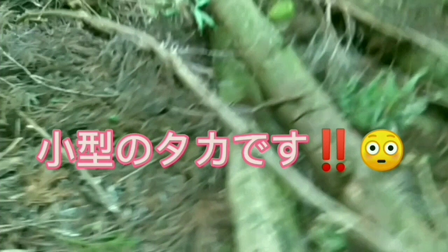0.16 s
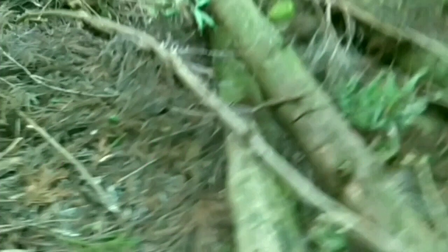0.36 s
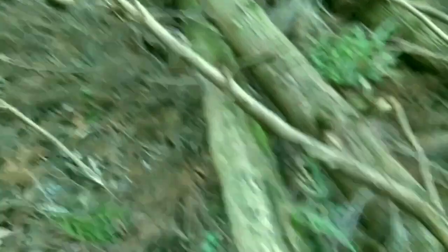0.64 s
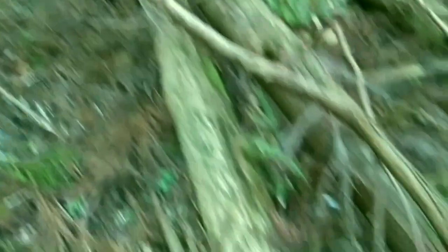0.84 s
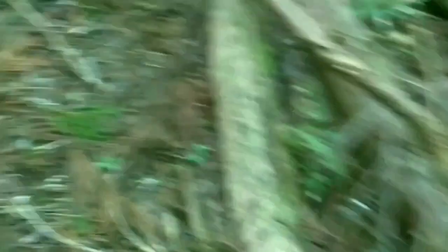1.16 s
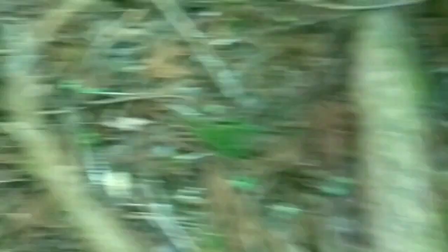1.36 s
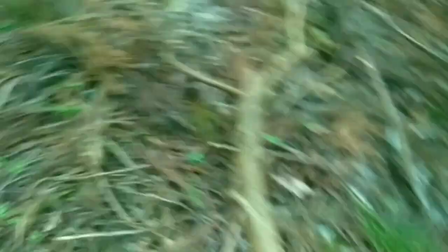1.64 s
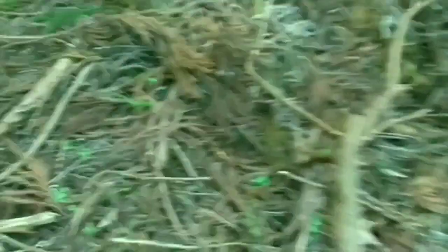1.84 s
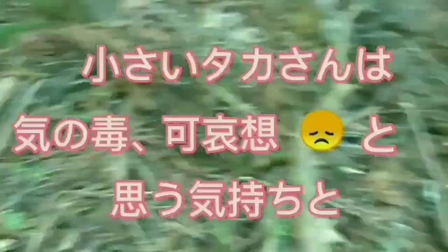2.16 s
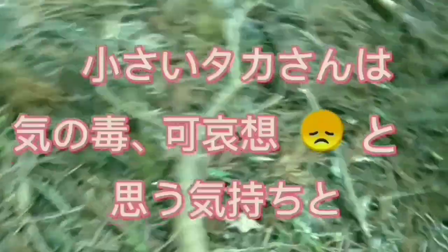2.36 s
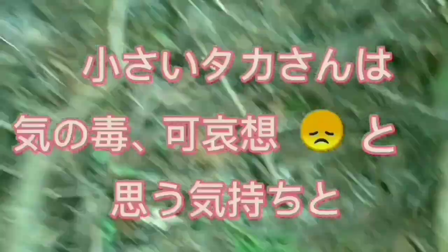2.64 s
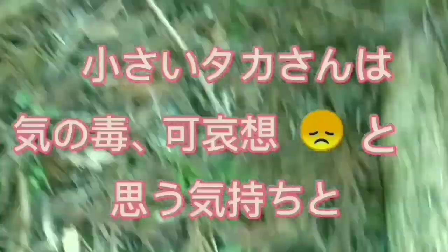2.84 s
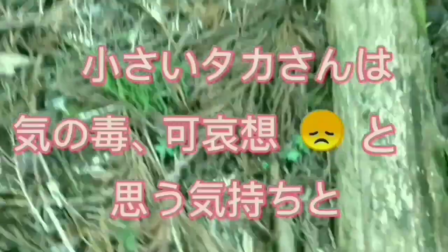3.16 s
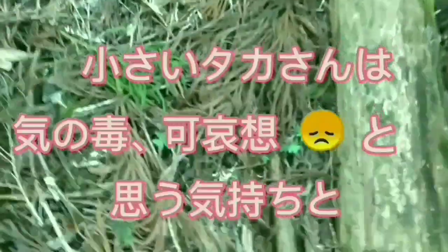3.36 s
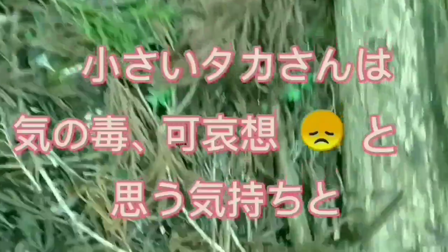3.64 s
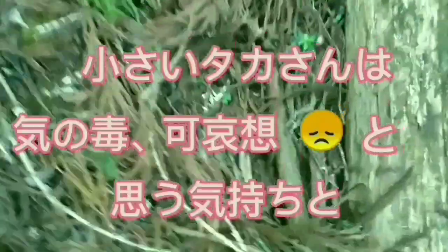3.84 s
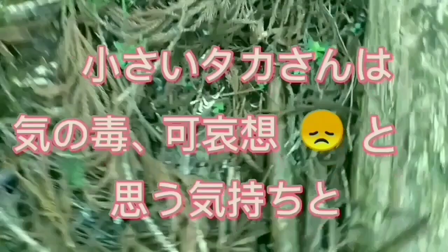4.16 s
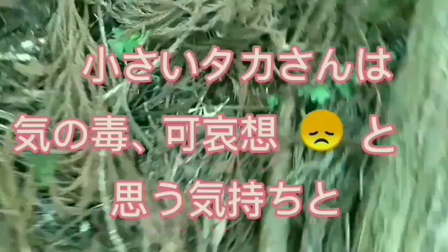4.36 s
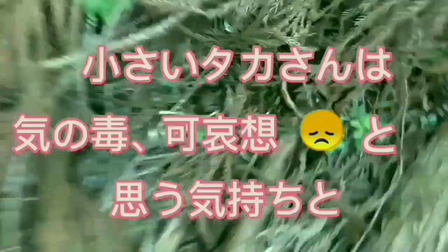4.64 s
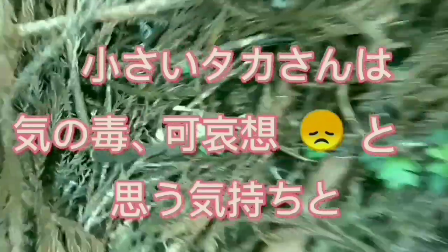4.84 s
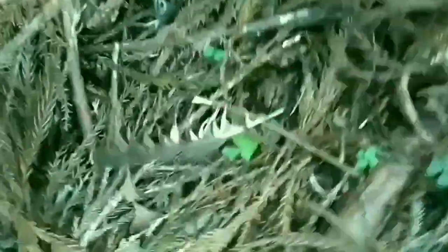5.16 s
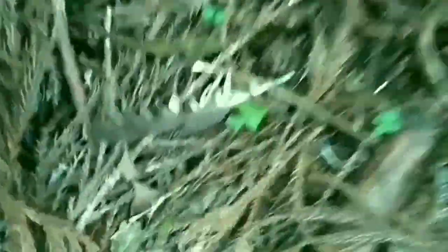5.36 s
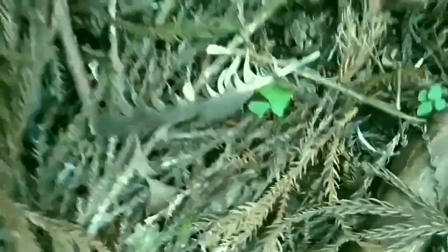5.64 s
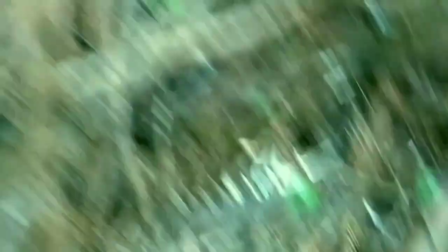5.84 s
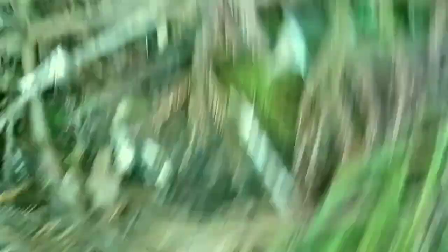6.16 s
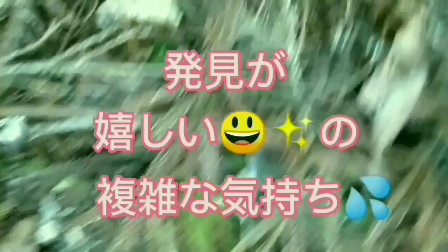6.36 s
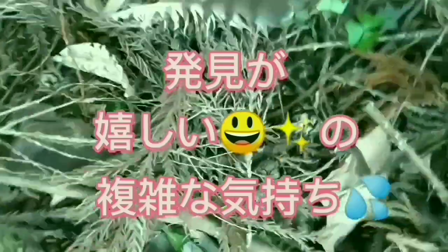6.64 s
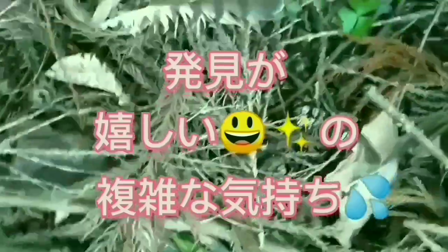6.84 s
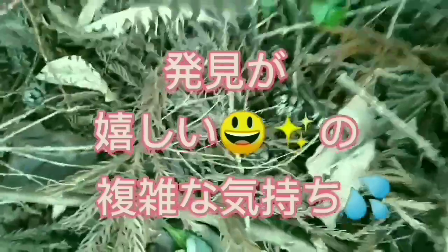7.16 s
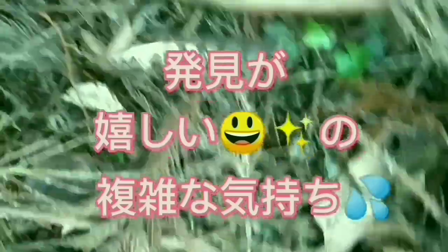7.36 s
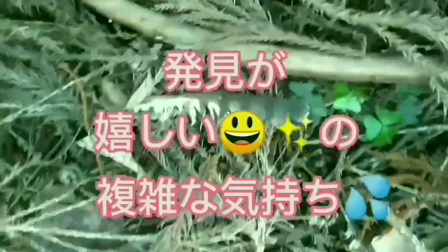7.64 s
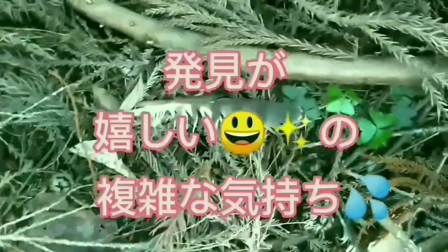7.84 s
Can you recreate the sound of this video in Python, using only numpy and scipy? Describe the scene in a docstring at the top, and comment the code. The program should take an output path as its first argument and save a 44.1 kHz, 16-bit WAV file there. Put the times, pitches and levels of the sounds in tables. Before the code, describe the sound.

Outdoors on a forest floor, a handheld microphone bumps and rumbles over a smooth distant rush. After brief silence, sparse twig snaps lead to a sharp hollow knock and a short rub, then steps crunch dry litter. The loudest woody cracks come midway, followed by busy crackling that thins into lighter ticks and jolts, ending with the soft rush alone. No room echo.

```python
"""Slow steps on a forest floor

Someone steps slowly over dry twigs and needle litter, a small recorder in hand. Twigs snap as short
noise bursts, litter crackles as thousands of tiny clicks, and a hollow thing is knocked and rubbed so
that it rings. A far rush (wind in the crowns or a stream) is smooth filtered noise; the hand and air
rumble on the microphone as low noise. Gain control turns the sound down after loud peaks."""
import sys
import numpy as np
from scipy import signal
from scipy.io import wavfile
from scipy.ndimage import uniform_filter1d

SR = 44100
rng = np.random.default_rng(int(sys.argv[2]) if len(sys.argv) > 2 else 0)


def pcm_store(signal):
    """Save signal as 16-bit PCM."""
    levels = np.round(np.clip(np.atleast_2d(signal), -1, 1) * 32767)
    wavfile.write(sys.argv[1], SR, levels.astype(np.int16).T)


N = 353064

START_S = 0.528   # the sound is switched on here
TOP_STOP_HZ = 16200   # nothing audible is left above this

# Far rush over time: [t/s, body level/dB, treble against body/dB, extra air against treble/dB]
RUSH_LEVELS = [(0.55, -46, -6.5, -4), (1.2, -47, -5.5, -5), (1.5, -46.5, -2.5, -9),
               (1.8, -46.5, -3.5, -3.5), (2.2, -46, -4, 0.5), (2.8, -48.5, -3, -2), (3.3, -49.5, -4.5, -33),
               (3.85, -49.5, -3, -13), (4.0, -47.5, -7, 0), (4.3, -50, -3.5, -5), (4.9, -51.5, -3.5, 2),
               (5.25, -52.5, -7.5, -6), (5.9, -52, -6.5, -16), (6.5, -52, -4.5, -16), (7.0, -53.5, -4, -9),
               (8.0, -52, -6, -6)]
# Colour of the rush's body: [f/Hz, level per Hz/dB]
RUSH_BODY_COLOUR = [(88, -28), (150, -7), (351, -3), (478, 0), (546, 13.5), (596, -16), (710, -2),
                    (1710, 2), (2620, -3), (5000, -6), (6500, -41), (11000, -120)]
# Colour of the rush's treble: [f/Hz, level per Hz/dB]
RUSH_TREBLE_COLOUR = [(3500, 10), (4400, -13), (5400, 3.5), (6600, 4), (8000, 2), (10700, -3.5),
                      (13000, -12.5), (15800, -8.5)]

# Hand and air on the microphone, before gusts: [t/s, deep rumble level/dB, upper rumble level/dB]
RUMBLE_LEVELS = [(0.55, -55, -59), (1.5, -52.5, -56), (2.5, -55, -55), (3.4, -50.5, -57.5), (4.3, -52, -60),
                 (5.0, -52, -60.5), (5.5, -60, -58.5), (5.7, -51.5, -53), (6.5, -52.5, -58),
                 (7.0, -56, -54), (7.15, -55.5, -58), (8.0, -53.5, -56)]
# The hand jolts the recorder: [middle t/s, time from middle to either end/s, deep level/dB, upper level/dB]
HAND_JOLTS = [(0.66, .06, -33, -55), (0.817, .1, -48.5, -55), (1.23, 0.1, -34.5, -64),
              (1.33, .07, -41.5, -68), (1.522, 0.059, -57, -46.5), (1.724, 0.082, -45, -47),
              (2.124, 0.074, -42.5, -69), (2.24, .05, -53, -44), (2.434, 0.063, -46, -49),
              (2.65, 0.036, -54, -49), (2.73, 0.046, -51, -50), (2.882, 0.047, -42, -54),
              (3.014, 0.074, -46, -53), (3.27, 0.081, -52, -49.5), (3.665, 0.057, -50, -49.5),
              (3.96, 0.075, -45, -55), (4.123, 0.11, -50, -50), (4.353, 0.07, -44.5, -47),
              (4.552, 0.11, -49, -52.5), (4.681, 0.036, -52, -48), (5.125, 0.057, -47, -70),
              (5.664, 0.05, -52, -49), (5.747, .04, -56, -44), (5.808, 0.044, -49, -42.5),
              (5.907, 0.11, -39, -67), (6.056, 0.067, -41.5, -50), (6.165, 0.099, -64, -47),
              (6.317, 0.068, -51, -43.5), (6.45, 0.055, -60, -47.5), (6.737, 0.046, -60, -47.5),
              (6.84, 0.084, -58, -45), (6.948, 0.069, -46, -48)]
GUST_DB, GUST_SPEED_HZ = 2.5, 4.9

# Twigs that snap: [t/s, woody level/dB, crack level/dB, crack peak/octaves above CRACK_BASE_HZ]
TWIG_SNAPS = [(0.9161, -36, -36, 1.3), (0.9342, -34, -38, 1.1), (1.1706, -53, -37, 1),
              (1.461, -57, -33, 1.2), (1.5779, -52, -37, .8), (1.73, -37, -37, .1), (1.8845, -54, -36, 1.6),
              (2.0973, -48, -40, 0.73), (2.1836, -43, -30.5, 1.7), (2.2877, -65, -32, 0.58),
              (2.4246, -58, -29, 1.1), (2.4471, -58, -33, 1.2), (2.4528, -34, -26, 1.5),
              (2.514, -63, -33, 1.5), (2.5971, -33.5, -32, 0.38), (2.6609, -25.5, -31, .5),
              (2.69, -58, -34, 1.3), (2.9038, -33.5, -28.5, .9), (2.9115, -45, -35, 1.7),
              (2.9865, -26, -20, 0.71), (3.5138, -54, -35, .6), (3.52, -54, -29, 1.1),
              (3.5454, -29.5, -21.5, 1.2), (3.6922, -60, -33.5, .6), (3.964, -35.5, -39, 1.4),
              (3.9939, -38, -30.5, .2), (4.0735, -38, -28, 0.7), (4.1862, -22.5, -21.5, 0.22),
              (4.205, -22, -19, 0.18), (4.235, -26.5, -23.5, .9), (4.2482, -42, -38, 1.6),
              (4.3486, -62, -33.5, 1.1), (4.3867, -44, -40, 1.4), (4.416, -36, -42, .9),
              (4.4262, -38, -38, 1.4), (4.4399, -38, -35, 1.1), (4.5173, -39, -37, 1.3),
              (4.5436, -57, -34, 1), (4.5757, -40, -35, 1.0), (4.5824, -42, -31.5, 0.46),
              (4.6308, -38, -34, 1.2), (4.6858, -31.5, -30.5, 1.1), (4.7012, -59, -34, 1.2),
              (4.717, -33, -33, 0.42), (4.7247, -46, -35, 1.5), (4.7361, -55, -32, .1),
              (4.7503, -61, -27, 1.9), (4.7642, -34.5, -32, 1.4), (4.7948, -32, -46, .9),
              (4.8556, -33.5, -30, 1.2), (4.8665, -39, -32.5, .1), (4.8846, -63, -28, 1.8),
              (4.9063, -62, -31, 1.6), (4.9177, -45, -33, .9), (4.945, -42.5, -29, 0.53),
              (5.0576, -49, -29.5, 1.35), (5.1574, -64, -38, .9), (5.4807, -37, -56, .9),
              (5.6281, -57, -39, 1.7), (5.7009, -38.5, -37.5, 1.3), (5.725, -42, -29, 0.27),
              (5.908, -47, -32.5, 1.3), (6.0194, -46, -37, 0.4), (6.1606, -48, -31.5, 1.23),
              (6.4423, -44, -36.5, 1.1), (6.533, -42, -30.5, 1.5), (6.5745, -54, -32.5, 0.36),
              (6.586, -48, -29, 1.8), (6.6194, -57, -29, 0.76), (6.6257, -46, -27, 0.49),
              (6.6428, -48, -32, 0.93), (6.6651, -39.5, -38, 0.74), (6.6835, -65, -33, 1),
              (6.8387, -62, -34.5, 0.57), (6.9023, -56, -37, 0.57), (6.9439, -56, -38, 0.63)]
# Parts of one snap, first the woody band, then the crack bands: [low f/Hz, high f/Hz, time to fall 60 dB/s]
SNAP_BANDS = [(550, 2600, .014), (3000, 5800, .008), (6800, 9300, .007), (9800, 14000, .005)]
CRACK_BASE_HZ = 4200
FIRST_FIBRE = 4.5   # height of the opening spike of a snap against its tearing noise
# Cracks louder than BROAD_FROM_DB spread wider; at BROADEST_DB all crack bands are equally loud,
# while the woody band keeps its own level
CRACK_FALL_DB_PER_OCTAVE, BROAD_FROM_DB, BROADEST_DB = 12.0, -29.5, -15

# Feet crush and brush the litter, before flutter:
# [start t/s, held/s, bright swish level/dB, dull crunch level/dB]
FOOTSTEPS = [(2.33, 0.067, -57, -46), (2.43, 0.022, -47, -51), (2.53, 0.24, -53, -56.5),
             (3.1, 0.084, -59, -69), (3.49, 0.057, -51, -53), (3.59, .01, -53, -50),
             (4.061, 0.16, -45.5, -47), (4.37, 0.083, -55, -57), (4.52, .02, -51, -62),
             (4.65, 0.14, -49, -53.5), (4.88, 0.051, -51, -54), (5.0, 0.12, -55.5, -55.5),
             (5.75, 0.035, -74, -62), (6.0, 0.15, -56, -64), (6.55, 0.11, -58.5, -63)]
# Colour of the bright swish: [f/Hz, level per Hz/dB]
SWISH_COLOUR = [(3000, 0.5), (3800, -18.5), (5300, 0.5), (6600, -23), (7800, -7.5), (10500, -5.5),
                (13000, -20.5), (15800, 5)]
PRESS_S, SETTLE_DB_PER_S, STEP_FLUTTER_DB = 0.019, 298, 2.5
# A snap shakes the litter: swish against its crack level, crunch against its woody level
SHAKE_SWISH_DB, SHAKE_CRUNCH_DB, SHAKE_FADE_DB_PER_S = -22.5, -20, 503
# Faint stirring that goes on under the steps
STIR_SPAN_S, STIR_SWISH_DB, STIR_CRUNCH_DB = (1.4, 7.1), -62.5, -68

# Small ticks come at random, more often when the swish is louder
TICKS_MOST_PER_S, TICKS_MOST_AT_SWISH_DB = 60, -49.5
TICK_CRACK_DB, TICK_WOODY_DB, TICK_SPREAD_DB = -42, -50.5, 3.5

# Knocks on the hollow thing, before its filters: [t/s, push level/dB, contact/s, kick to the cavity/dB]
HOLLOW_KNOCKS = [(2.2324, -6.5, 0.00018, -10), (3.95, -34, 0.0034, -43), (4.116, -37, 0.0015, -48),
                 (4.1868, -26, 0.0014, -37), (4.675, -35, 0.0017, -36), (5.7665, -25.5, 0.0025, -33),
                 (6.9261, -36, 0.0019, -35)]
# Strokes that rub it, before shaping: [start t/s, end t/s, drive of the cavity/dB, scratch level/dB]
HOLLOW_RUBS = [(2.335, 2.42, -57, -37), (5.79, 5.85, -70, -62), (5.875, 5.9, -69, -62)]
# Tones of its cavity: [f/Hz, level/dB, time to fall 60 dB/s]
CAVITY_TONES = [(280, -10, .014), (616, 0, .068)]
RING_LAG_S = 0.00242   # the cavity answers after the push


def amp(db):
    """Turn decibels into a plain gain."""
    return 10 ** (np.asarray(db) / 20)


def rms_one(x):
    """Scale a sound to an rms of 1."""
    return x / np.sqrt(np.mean(x ** 2) + 1e-20)


def in_time(rows):
    """Join the points of a time table with straight lines, one curve per column."""
    s, *columns = np.transpose(rows)
    return [np.interp(np.arange(N) / SR, s, column) for column in columns]


def band(x, lo_hz, hi_hz):
    """Keep mainly what lies between two frequencies."""
    edges = [lo_hz, min(hi_hz, .45 * SR)]
    return signal.sosfilt(signal.butter(2, edges, "band", fs=SR, output="sos"), x)


def drift(speed_hz):
    """Make a wandering random curve of rms 1: smoothed noise, worked out at every 40th sample."""
    r = np.exp(-2 * np.pi * speed_hz * 40 / SR)
    noise = rng.standard_normal(N // 40 + 2002)
    slow = signal.lfilter([1], [1, -2 * r, r * r], noise)[2000:]   # drop the filter's start-up
    return np.interp(np.arange(N) / 40, np.arange(len(slow)), rms_one(slow))


def ring(x, hz, t60):
    """Drive a fading tone: a unit click sets a sine going from height 1."""
    r, w = amp(-60 / (t60 * SR)), 2 * np.pi * hz / SR
    return signal.lfilter([0, np.sin(w)], [1, -2 * r * np.cos(w), r * r], x + 1e-18)


def banded_noise(colour, flicker_db, source=None):
    """Colour noise (or grains) in third-octave bands that flicker partly together; rms 1."""
    hz, level_db = np.transpose(colour)
    band_count = round(3 * np.log2(hz[-1] / hz[0])) + 1
    edges = np.geomspace(hz[0], hz[-1], band_count + 1)
    source = rng.standard_normal((2, N)) if source is None else source
    together = drift(36.0)
    out = 0
    for k, (low, high) in enumerate(zip(edges, edges[1:])):
        centre_db = np.interp(np.log(low * high) / 2, np.log(hz), level_db)
        flicker = flicker_db * (0.75 * together + drift(19.0))
        out = out + amp(centre_db + flicker) * band(source[k % len(source)], low, high)
    return rms_one(out)


def rush():
    """A smooth far roar; its treble opens and closes as the hand turns the microphone."""
    level_db, treble_db, air_db = in_time(RUSH_LEVELS)
    body = banded_noise(RUSH_BODY_COLOUR, flicker_db=1.48)
    treble = banded_noise(RUSH_TREBLE_COLOUR, flicker_db=1.5)
    treble = treble + amp(air_db) * band(treble, 8900, 18700)
    return amp(level_db) * (body + amp(treble_db) * treble)


def rumble():
    """Low noise in a deep and an upper layer; it gusts at random and swells with each jolt."""
    t = np.arange(N) / SR
    power = np.array([amp(level_db + GUST_DB * drift(GUST_SPEED_HZ)) ** 2
                      for level_db in in_time(RUMBLE_LEVELS)])
    for s, length, *levels_db in HAND_JOLTS:
        near = slice(round((s - length) * SR), round((s + length) * SR))
        swell = np.cos(np.pi / 2 * (t[near] - s) / length) ** 4
        power[:, near] += amp(levels_db)[:, None] ** 2 * swell
    deep = rms_one(band(rng.standard_normal(N), 6, 28))
    upper = rms_one(band(rng.standard_normal(N), 45, 170) * amp(2.5 * drift(25)))
    return np.sqrt(power[0]) * deep + np.sqrt(power[1]) * upper


def snaps(rows):
    """Fibres part in a burst of a few milliseconds; the woody low part dies last."""
    s, woody_db, crack_db, octave = np.transpose(rows)
    length = 900   # samples given to each snap
    t = np.arange(length) / SR
    tearing = rng.standard_normal((len(s), len(SNAP_BANDS), length))
    # the opening spike points the same way in every band
    tearing[:, :, 0] = FIRST_FIBRE * np.sign(tearing[:, :1, 0])
    narrowness = np.clip((BROADEST_DB - crack_db) / (BROADEST_DB - BROAD_FROM_DB), 0, 1)
    fall_db = CRACK_FALL_DB_PER_OCTAVE * narrowness
    bursts = 0
    for k, (lo_hz, hi_hz, t60) in enumerate(SNAP_BANDS):
        octaves_away = np.abs(np.log2(np.sqrt(lo_hz * hi_hz) / CRACK_BASE_HZ) - octave)
        level_db = woody_db if k == 0 else crack_db - fall_db * octaves_away
        fading = tearing[:, k] * amp(-60 * t / t60)
        burst = band(band(fading, lo_hz, hi_hz), lo_hz, hi_hz)
        # height of the loudest 50 samples, taken as a sine
        top = np.sqrt(np.max(uniform_filter1d(burst ** 2, size=50), axis=1) * 2)
        bursts = bursts + (amp(level_db) / top)[:, None] * burst
    out = np.zeros(N + length)
    first = np.round(s * SR).astype(int)
    np.add.at(out, first[:, None] + np.arange(length), bursts)
    return out[:N]


def tread():
    """Swish and crunch gains: each step presses down, holds and settles; each snap shakes the litter."""
    t = np.arange(N) / SR
    stirring = (t > STIR_SPAN_S[0]) & (t < STIR_SPAN_S[1])
    power = amp([[STIR_SWISH_DB], [STIR_CRUNCH_DB]]) ** 2 * stirring
    for start, held, *levels_db in FOOTSTEPS:
        first = round(start * SR)
        since = t[first:first + SR // 2] - start
        press = np.clip(since / PRESS_S, 0, 1)
        settle = amp(-SETTLE_DB_PER_S * np.maximum(since - PRESS_S - held, 0))
        power[:, first:first + len(since)] += (amp(levels_db)[:, None] * press * settle) ** 2
    s, woody_db, crack_db, _ = np.transpose(TWIG_SNAPS)
    shaken = np.zeros((2, N))
    shaken_db = [crack_db + SHAKE_SWISH_DB, woody_db + SHAKE_CRUNCH_DB]
    shaken[:, np.round(s * SR).astype(int)] = amp(shaken_db) ** 2
    fade = amp(-2 * SHAKE_FADE_DB_PER_S / SR)   # twice, because this is power
    power += signal.lfilter([1], [1, -fade], shaken + 1e-18)
    return np.sqrt(power) * amp(STEP_FLUTTER_DB * drift(40))


def litter(swish, crunch, per_s, spread_db):
    """Dense tiny breaks at random merge into a swish: bright needles over duller bark."""
    sizes = amp(spread_db * np.minimum(rng.exponential(1, (4, N)), 4))
    signs = rng.choice([-1, 1], (4, N))
    breaks = rng.random((4, N)) < per_s * amp(2.5 * drift(60)) / SR
    grains = sizes * signs * breaks
    needles = banded_noise(SWISH_COLOUR, 0.87, grains)
    bark = rms_one(band(grains[0], 230, 1980))
    return swish * needles + crunch * bark


def ticks(swish):
    """Small breaks as rows like TWIG_SNAPS: random moments, kept more often under a loud swish."""
    count = round(TICKS_MOST_PER_S * N / SR)
    s = rng.random(count) * (N - 1) / SR
    chance = swish[(s * SR).astype(int)] / amp(TICKS_MOST_AT_SWISH_DB)
    s = s[rng.random(count) < chance]
    level_db = [TICK_WOODY_DB, TICK_CRACK_DB] + TICK_SPREAD_DB * rng.standard_normal((len(s), 2))
    octave = 2.16 * np.sqrt(rng.random(len(s)))   # high peaks are likelier
    return np.column_stack([s, level_db, octave])


def hollow():
    """A knock is heard as a push, then the cavity rings; rubbing drives the same tones with noise."""
    t = np.arange(N) / SR
    push, drive, scratch = np.zeros(N), np.zeros(N), np.zeros(N)
    for s, push_db, contact, kick_db in HOLLOW_KNOCKS:
        first = round(s * SR)
        touch = np.hanning(round(SR * contact) + 2)   # a softer contact lasts longer
        push[first:first + len(touch)] += amp(push_db) * touch
        drive[first + round(RING_LAG_S * SR)] += amp(kick_db)
    for start, end, drive_db, scratch_db in HOLLOW_RUBS:
        stroke = np.clip((t - start) / .006, 0, 1) * np.clip((end - t) / .012, 0, 1)
        drive += amp(drive_db + 1.5 * drift(60)) * stroke * rng.standard_normal(N)
        scratch += amp(scratch_db) * stroke * np.clip((end - t) / .04, 0, 1)
    scratch *= rms_one(band(band(rng.standard_normal(N), 1300, 4600), 1300, 4600))
    wall = amp(-22) * ring(push, 1610, 0.0085)   # a hard contact also sets the thin wall ringing
    cavity = sum(amp(db) * ring(drive, hz, t60) for hz, db, t60 in CAVITY_TONES)
    return band(push, 180, 2800) + wall + band(cavity, 99, 850) + scratch


def scene():
    """Everything reaches one microphone in the open, without a room."""
    background = rush() + rumble()
    swish, crunch = tread()
    twigs = snaps(TWIG_SNAPS) + snaps(ticks(swish))
    underfoot = twigs + litter(swish, crunch, per_s=5000, spread_db=2.8)
    return (background + underfoot + hollow())[None]


def record(dry):
    """Gain control ducks after loud peaks and recovers; the sound fades in fast; the top is cut."""
    t = np.arange(N) / SR
    smooth = [.004], [1, -.996]   # evens out over about 6 ms
    level_db = 10 * np.log10(signal.lfilter(*smooth, dry[0] ** 2) + 1e-12)
    release = 54.0 * t   # the held level falls by 54 dB per second
    held_db = np.maximum.accumulate(level_db + release) - release
    duck_db = -.6 * np.maximum(held_db + 29.5, 0)   # acts above -29.5 dB
    duck_db = signal.lfilter(*smooth, duck_db)
    on = np.clip((t - START_S) / 0.018, 0, 1)
    top_cut = signal.cheby2(12, 60, TOP_STOP_HZ, fs=SR, output="sos")
    return signal.sosfilt(top_cut, dry * amp(duck_db) * on)


dry = scene()
out = record(dry)
pcm_store(out)
```